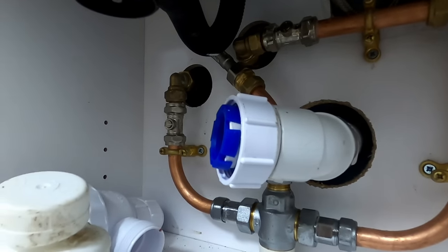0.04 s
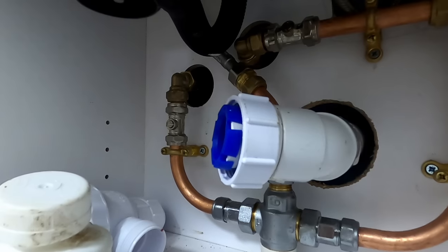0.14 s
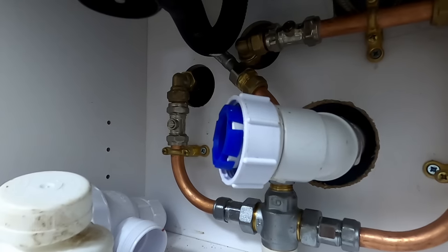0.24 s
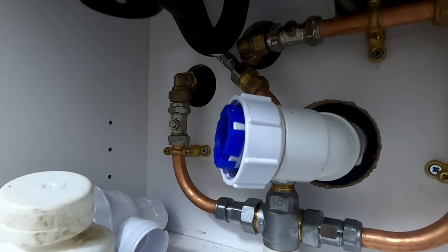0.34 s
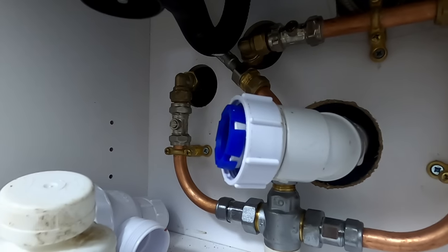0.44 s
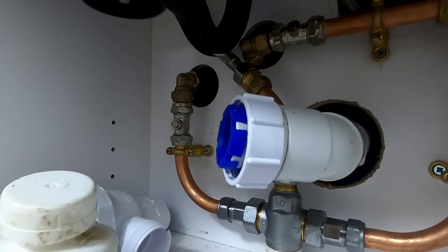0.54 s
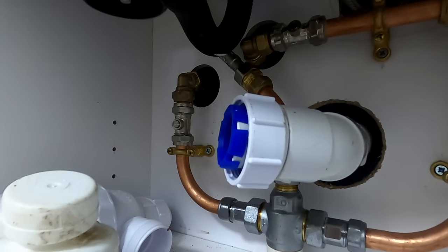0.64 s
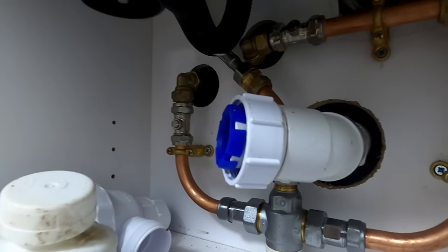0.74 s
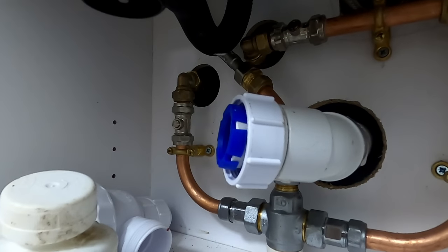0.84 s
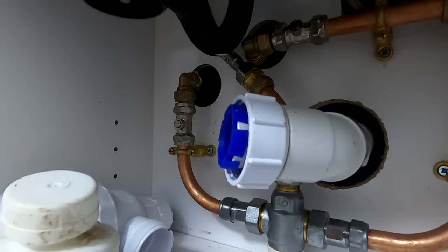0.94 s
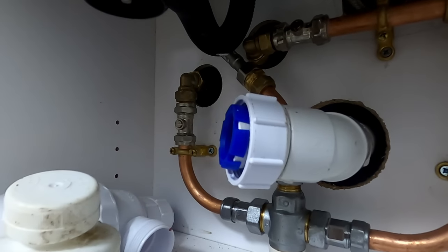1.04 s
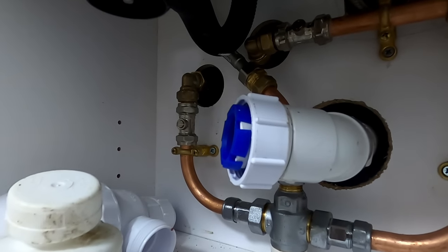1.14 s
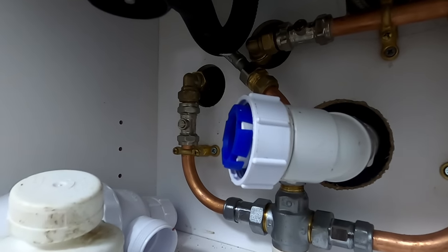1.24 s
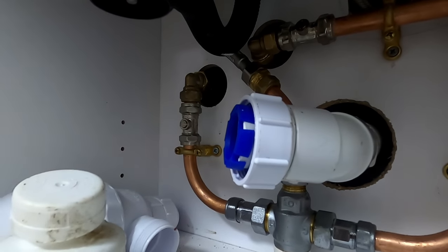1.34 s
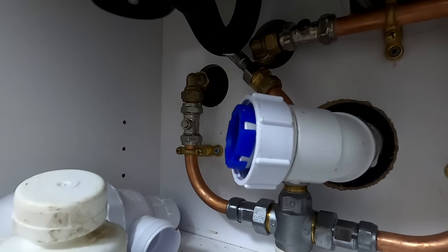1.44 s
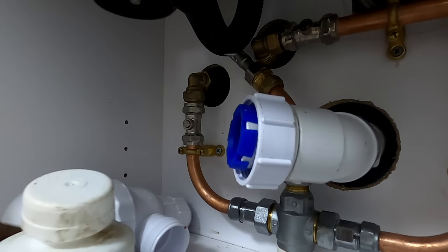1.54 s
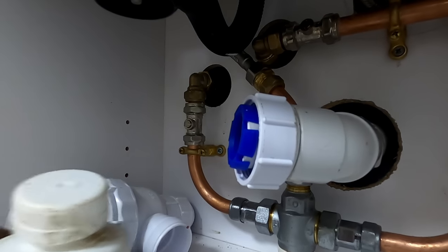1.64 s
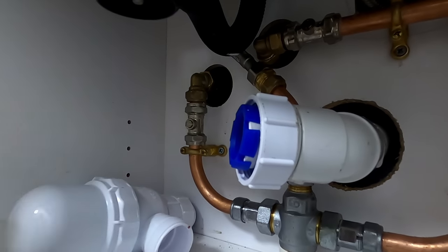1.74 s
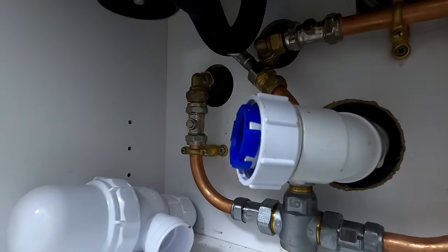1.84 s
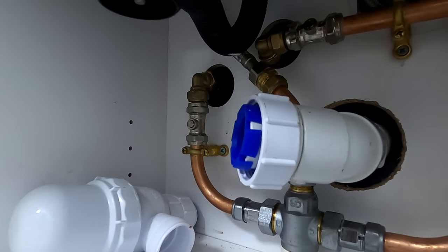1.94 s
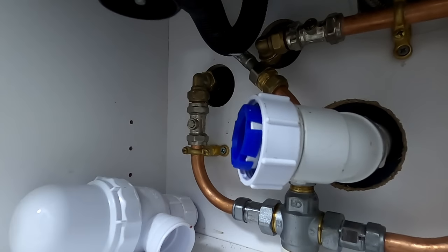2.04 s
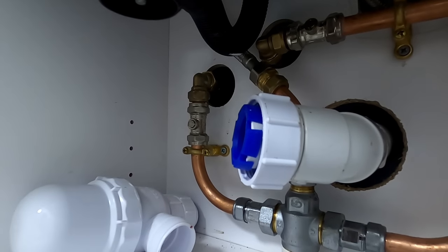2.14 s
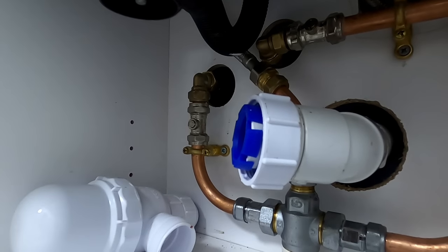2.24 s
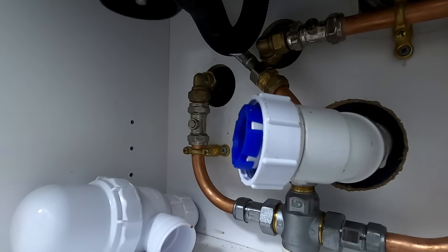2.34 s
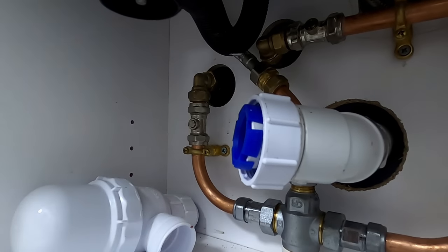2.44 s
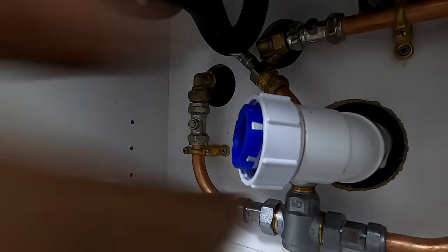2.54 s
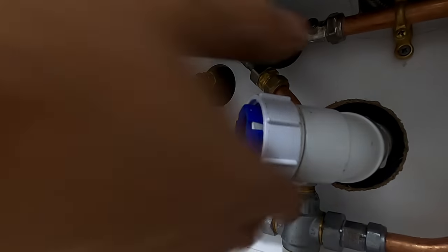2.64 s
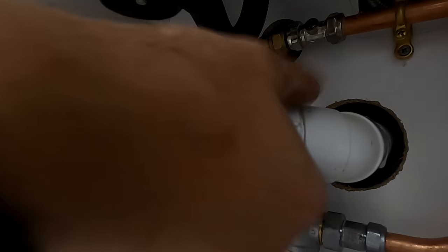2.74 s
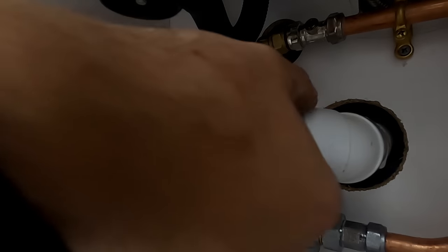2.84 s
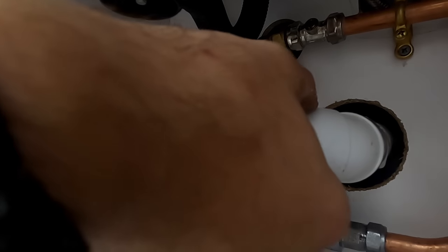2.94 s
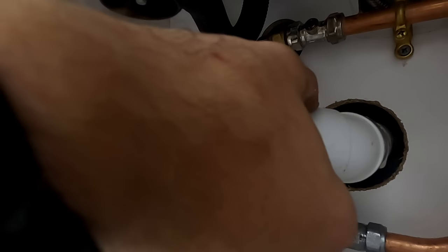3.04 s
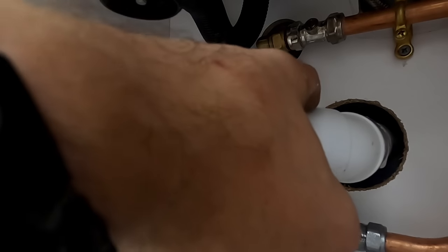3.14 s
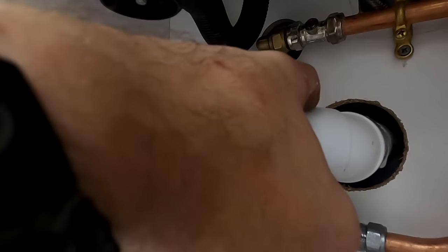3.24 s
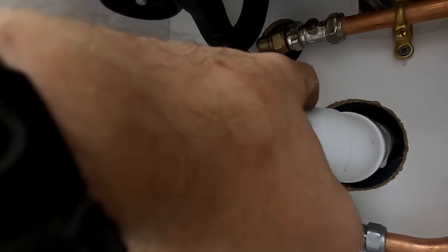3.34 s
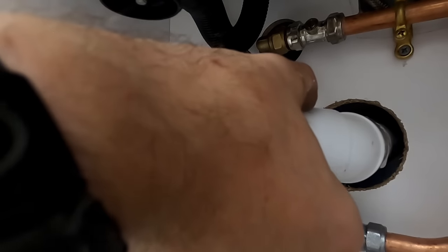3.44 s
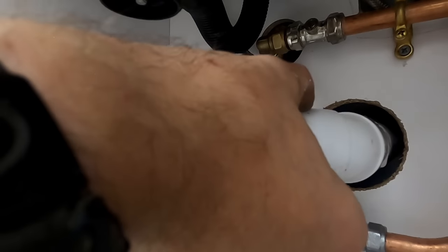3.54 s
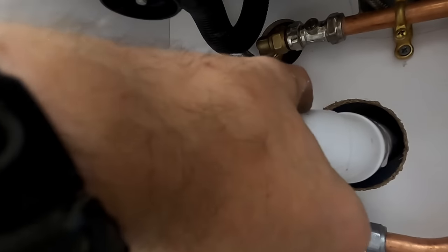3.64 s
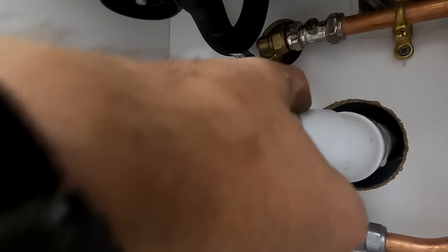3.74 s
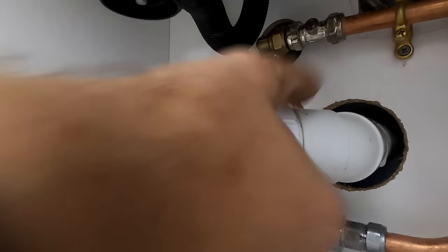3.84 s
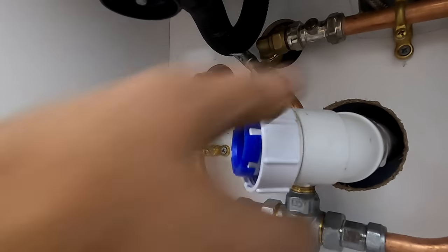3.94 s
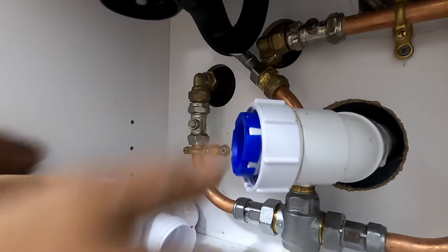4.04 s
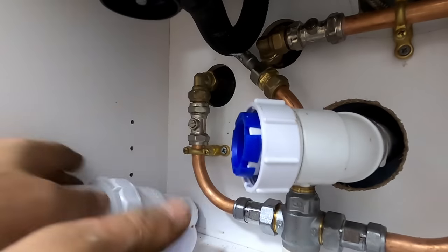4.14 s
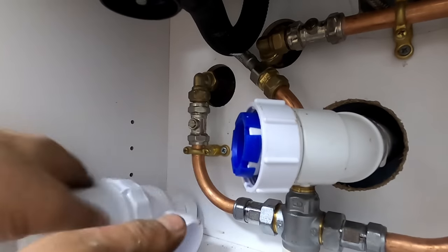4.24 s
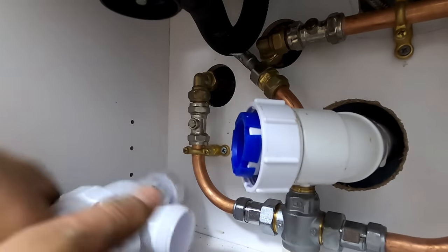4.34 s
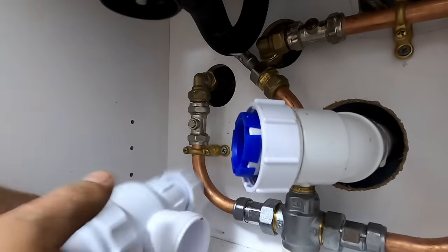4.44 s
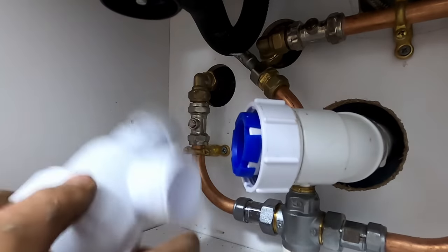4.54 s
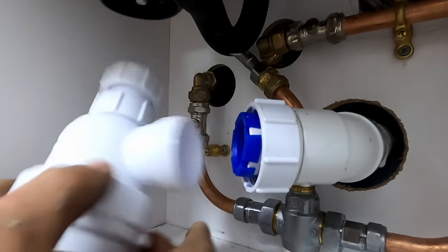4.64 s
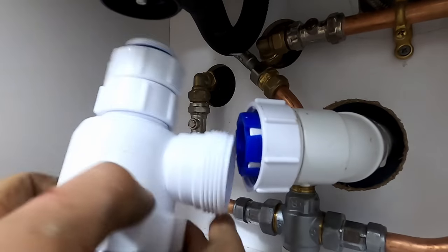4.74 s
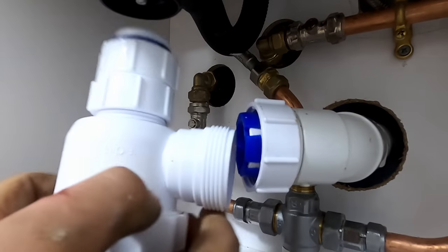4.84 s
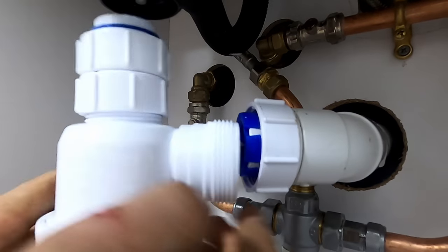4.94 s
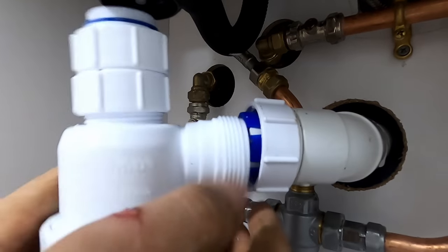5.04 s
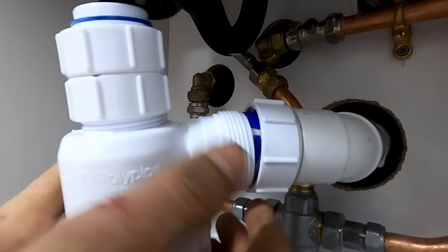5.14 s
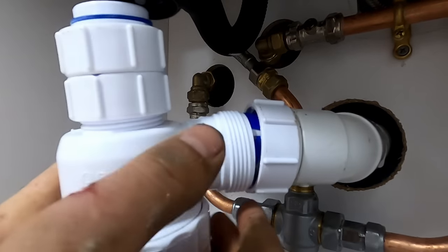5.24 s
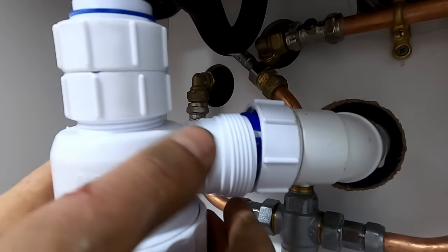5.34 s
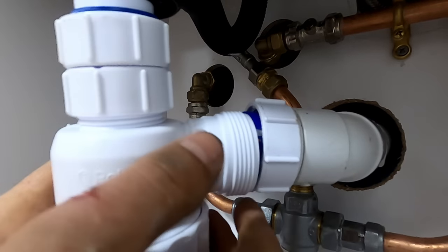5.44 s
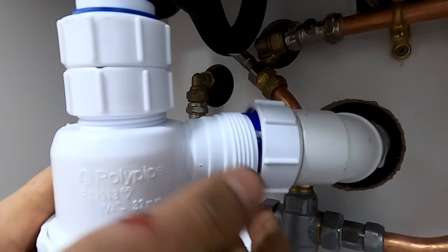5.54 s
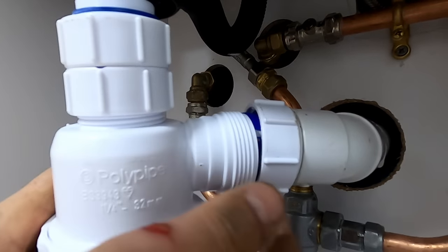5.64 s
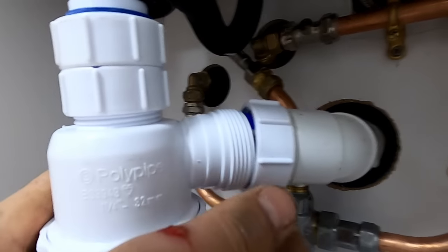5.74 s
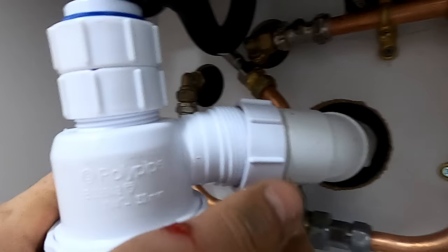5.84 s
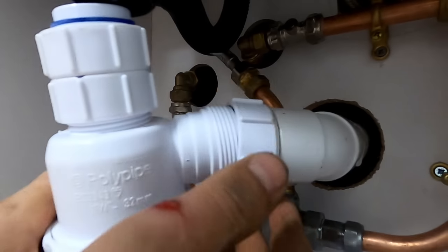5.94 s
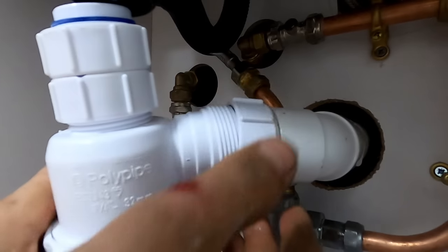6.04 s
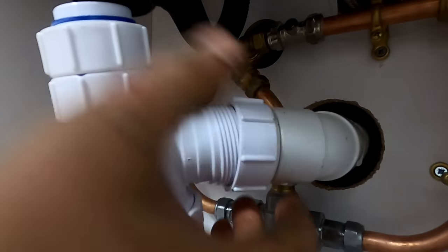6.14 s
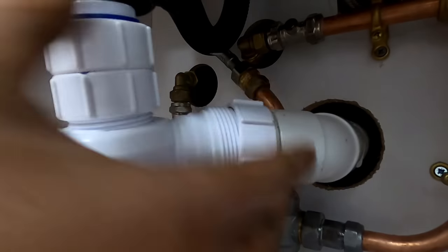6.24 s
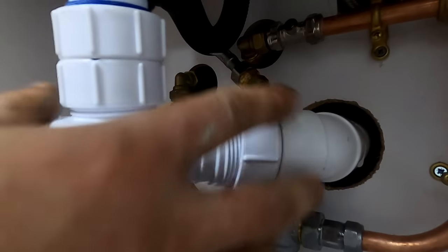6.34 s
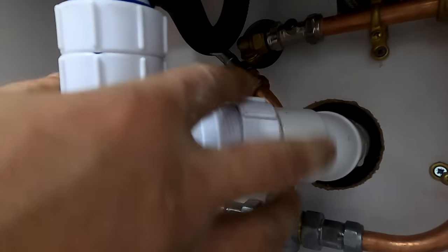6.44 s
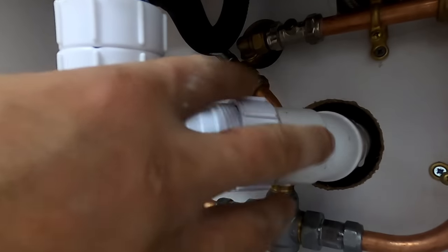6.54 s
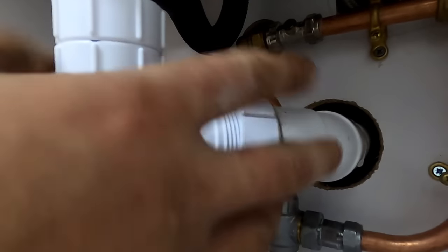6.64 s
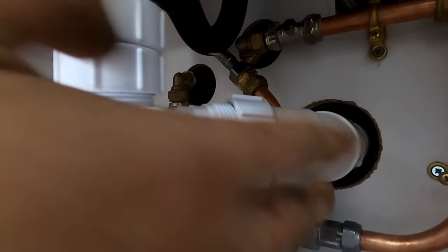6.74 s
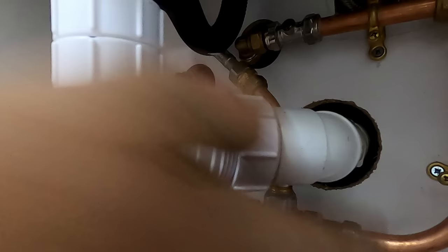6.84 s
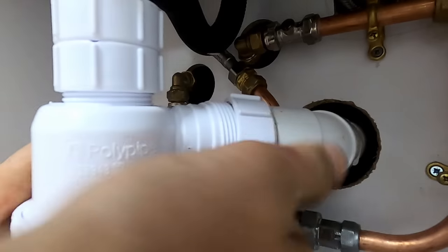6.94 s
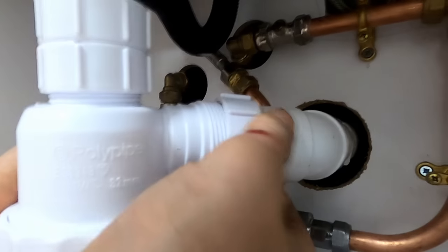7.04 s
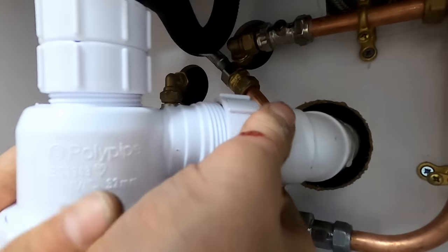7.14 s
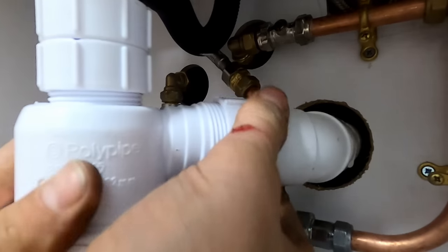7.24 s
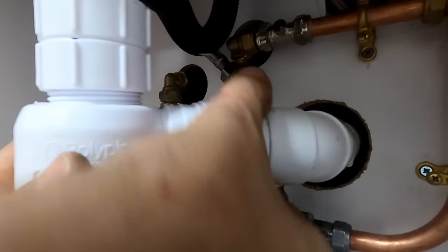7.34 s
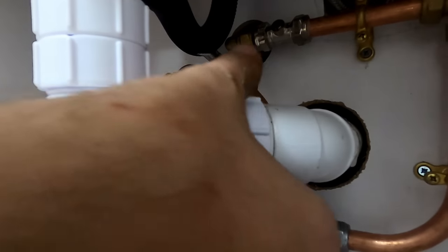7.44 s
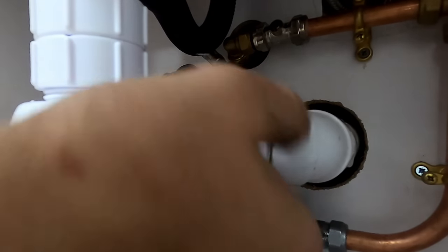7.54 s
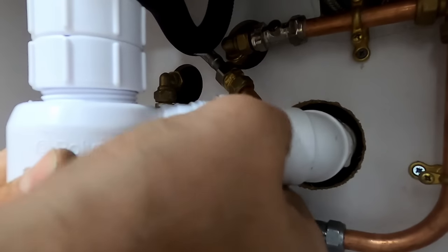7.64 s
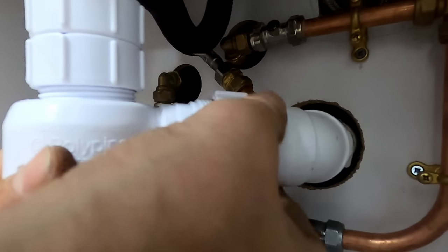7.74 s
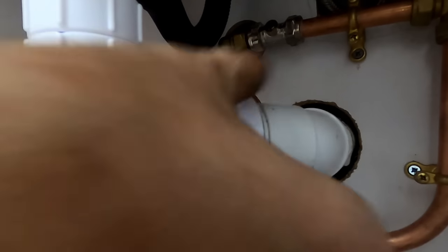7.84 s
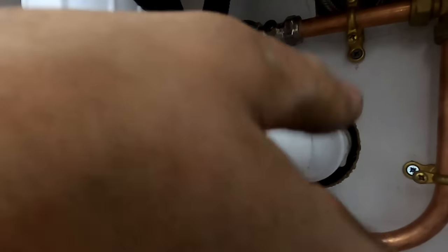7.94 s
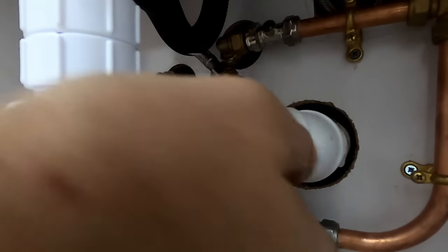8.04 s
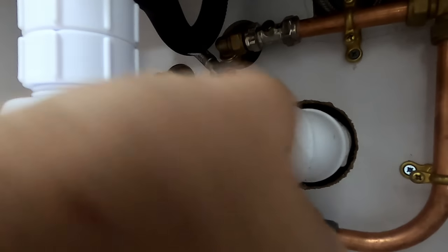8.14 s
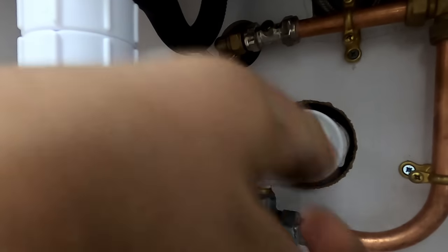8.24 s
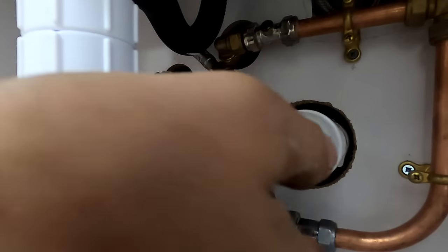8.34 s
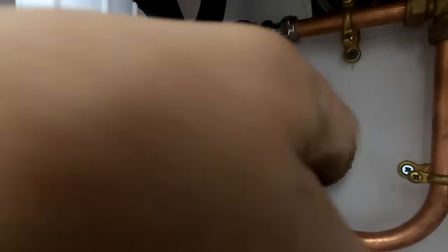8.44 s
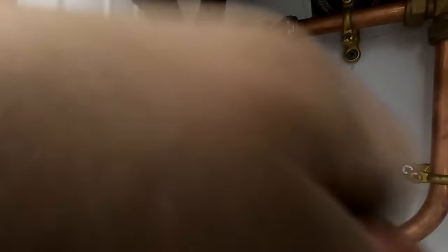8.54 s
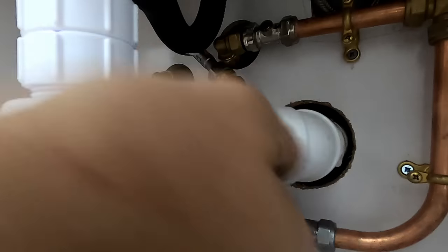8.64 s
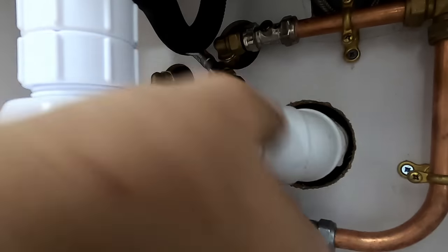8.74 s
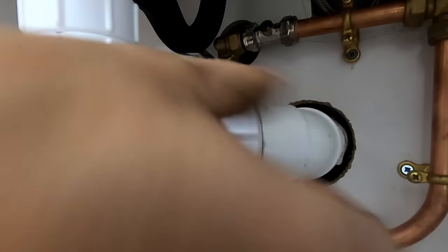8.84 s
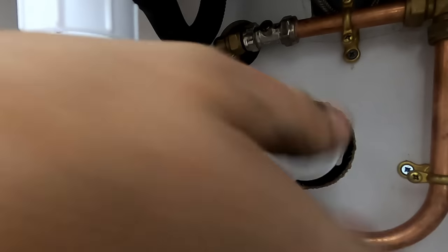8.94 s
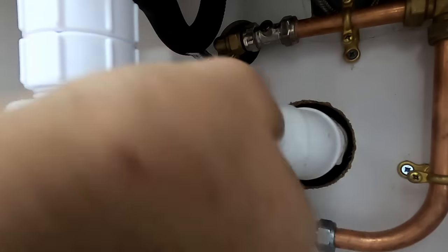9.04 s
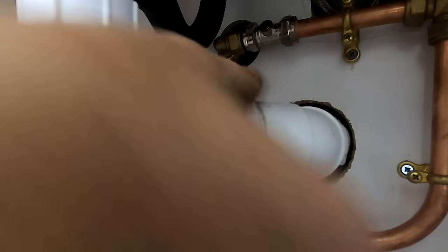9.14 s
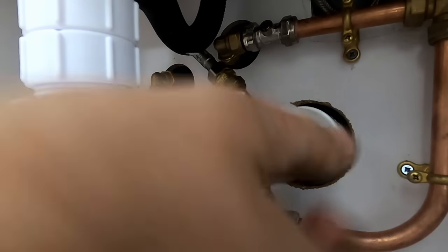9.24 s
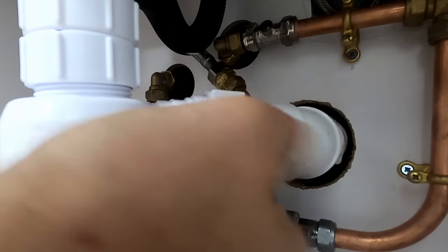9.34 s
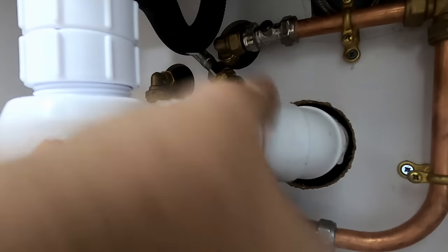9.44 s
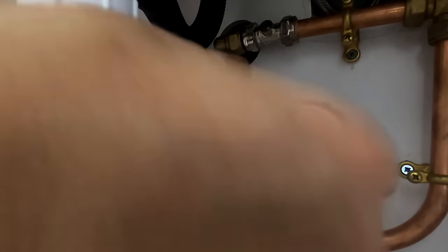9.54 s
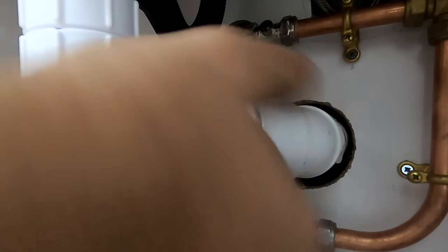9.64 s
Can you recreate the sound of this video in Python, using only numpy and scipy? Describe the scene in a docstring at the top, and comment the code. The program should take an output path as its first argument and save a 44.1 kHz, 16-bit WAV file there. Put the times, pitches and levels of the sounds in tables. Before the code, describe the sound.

Close microphone under a basin, quiet room with low rumble. Light sliding and a soft thud, one crisp plastic clack, then near silence. Quick hollow knocks and bright thread clatter as plastic parts are gathered and joined. Then a short low shudder, deep bumps, one strong thump, and repeated swishes of skin and sleeve with muffled plastic knocks as a nut is tightened, deep rumble growing.

```python
"""Hard plastic knocks as a bottle trap is picked up, pushed onto a waste pipe and its nut worked tight in a cabinet.
Each knock is a burst of contact force ringing the cabinet panels, the air in the trap, its thin walls and its rims.
Skids, shoves, soft bumps, scuffs, a loose fitting, a juddering seal and a squeaking thread drive rings in the same way.
Hands and a sleeve rub close to the microphone as shaped noise and tiny slips, and moving arms stir a deep rumble.
Behind it lie the short boom of the cabinet, a decaying noise echo, and a faint low room rumble."""
import sys
import numpy as np
from scipy import signal
from scipy.fft import rfft, irfft
from scipy.io import wavfile
from scipy.ndimage import uniform_filter1d

SR = 44100
rng = np.random.default_rng(int(sys.argv[2]) if len(sys.argv) > 2 else 0)


def master(y):
    """Save y as 16-bit WAV."""
    cut = np.clip(np.atleast_2d(y).T, -1, 1)
    pcm = np.round(cut * 32767)  # scale
    wavfile.write(sys.argv[1], SR, pcm.astype(np.int16))


N = 427769
RING_S = .4  # length of every impulse response
BLOW_S = .03  # lead-in before a blow lands, also the window that sets its level

# Hard plastic contacts.
# Columns: start_s, contact_s, level_db (before each part's share), hardness_db (plus for a rim, minus for a flat side)
KNOCKS = [(3.222, 0.0011, -39.5, 3), (3.557, 0.00052, -61, 11.5), (4.11, 0.0017, -44.5, -2.5),
          (4.198, 0.0011, -36.5, -3), (4.271, 0.0011, -39.5, 3.5), (4.294, 0.0035, -36, -7),
          (4.321, 0.00096, -36, -5), (4.376, 0.0018, -35.5, -4), (4.411, 0.001, -29.5, -2.5),
          (4.445, 0.0031, -34, -4), (4.531, 0.0016, -30.5, -2.5), (4.635, 0.0012, -32.5, 0.5),
          (4.811, 0.0011, -28.5, -1.5), (4.83, 0.0014, -40, 17), (4.863, 0.00031, -41, 8.5),
          (4.979, 0.00033, -27.5, 3), (5.039, 0.00036, -31, 5.5), (5.058, 0.0014, -45, 11.5),
          (5.187, 0.0021, -49, 1.5), (5.228, 0.00091, -49, 1.5), (5.547, 0.0019, -40, 3.5),
          (6.078, 0.00063, -45.5, -4), (6.435, 0.0013, -47.5, 4), (6.494, 0.00083, -48, -7.5),
          (6.768, 0.0037, -32, 4.5), (6.815, 0.0068, -30, 10), (6.869, 0.0028, -40.5, 4),
          (7.131, 0.0015, -33.5, 3), (7.163, 0.0013, -28.5, 0), (7.306, 0.00038, -45.5, -1.5),
          (7.759, 0.0054, -48.5, -1), (7.967, 0.0053, -37.5, 0.5), (7.99, 0.0029, -32, 2),
          (8.204, 0.00072, -37.5, 0.5), (8.359, 0.0019, -31.5, 2.5), (8.493, 0.0021, -38, 3),
          (8.591, 0.0049, -32, 2), (8.812, 0.0017, -51, 1), (8.957, 0.0026, -34.5, 5),
          (9.13, 0.0051, -45.5, 2.5), (9.177, 0.0016, -51.5, 2), (9.272, 0.00067, -50, 4.5),
          (9.312, 0.0039, -44, 2)]
# What each part takes of a knock; rows are panels, trap air, walls, rims.
# Columns: share_db, slope (dB per dB of hardness)
PART_SHARES = [(13.5, -0.48), (6.5, -0.98), (1, -0.08), (-7.5, 1.324)]


def knocks(panel_lag_s=0.0018):
    """Plastic on plastic: a hard contact favours the rims, a soft one the heavy panels, which ring a moment later."""
    out = np.zeros(N)
    parts = (panels, trap_air, walls, rims)
    lags_s = (panel_lag_s, 0, 0, 0)
    for start_s, contact_s, level_db, hardness_db in KNOCKS:
        force = contact(contact_s)
        for part, (share_db, slope), lag_s in zip(parts, PART_SHARES, lags_s):
            part_db = level_db + share_db + slope * hardness_db
            add(out, start_s - BLOW_S + lag_s, strike(force, part(), part_db))
    return out


def contact(contact_s, chatter_rate=6000, first=0.84, graze_db=-15, graze_s=0.011,
            slide_db=-25, slide_s=0.029, glancing_s=0.0018):
    """Force of a blow that lands BLOW_S in: the faces graze, touch, chatter as they skid together and slide to rest."""
    lead = int(BLOW_S * SR)
    t = np.arange(-lead, 4 * lead) / SR
    age = np.maximum(t, 0) / max(contact_s, 1 / 2000)
    skid = np.e * age * np.exp(-age)
    glancing = min(contact_s / glancing_s, 1)  # a square, short hit hardly grazes
    graze = undb(graze_db) * glancing * np.exp(-np.abs(t) / graze_s)
    slide = undb(slide_db) * (t > 0) * np.exp(-np.abs(t) / slide_s)
    force = slips(len(t), chatter_rate, spread_db=3.5) * (skid + graze + slide)
    force /= np.linalg.norm(force)
    # the longer the skid, the less of the force is in the first touch
    force[lead] += first * np.exp(-contact_s / 0.0026)
    return force


def strike(force, response, level_db):
    """A part driven by a force; its energy up to BLOW_S after landing sets the level."""
    sound = signal.fftconvolve(force, response)
    # the window also spans the lead-in, so it is twice as long as the blow
    return undb(level_db) * unit(sound, 2 * BLOW_S) * np.sqrt(1 / 2)


def ring(modes, crowd, crowd_db, crowd_t60, scatter_db=4.5):
    """Impulse response of a part; contact point and grip change every mode's strength and pitch a little."""
    t = np.arange(int(RING_S * SR)) / SR
    pitch_hz, level_db, t60_s = np.transpose(modes)[:, :, None]
    strength, detune, sign = rng.standard_normal((3, len(modes), 1))
    phase = 2 * np.pi * pitch_hz * (1 + .004 * detune) * t
    swell = 1 - np.exp(-phase / np.pi)  # a mode needs about half a cycle to get going
    decay = np.exp(-np.log(1000) * t / t60_s)
    lines = np.sign(sign) * undb(level_db + scatter_db * strength) * decay * swell * np.sin(phase)
    weak_modes = unit(shape(tail(crowd_t60), crowd), BLOW_S)
    return unit(lines.sum(0), BLOW_S) + undb(crowd_db) * weak_modes


# Strong modes of the cabinet panels. Columns: pitch_hz, level_db (relative), t60_s
PANEL_MODES = [(103, -4.5, 0.086), (123.5, -5, 0.24), (147.15, 0.5, 0.21), (191, 2, 0.15),
               (213.7, 0, 0.078), (259, -6, 0.061)]
# Crowd of weak panel modes between the strong ones. Columns: pitch_hz, level_db (per Hz, relative)
PANEL_CROWD = [(25, -23.5), (60, -4), (150, 13.5), (290, 1.5), (1000, -73)]


def panels():
    """Response of the cabinet panels at one contact point."""
    return ring(PANEL_MODES, PANEL_CROWD, crowd_db=-1.5, crowd_t60=0.034)


# Strong modes of the air in the trap. Columns: pitch_hz, level_db (relative), t60_s
AIR_MODES = [(310, -7, .07), (425, 3, .12), (500, 0, .09), (655, -5, .13), (777, -13, .1), (964, -8, .09)]
# Crowd of weak air modes, also used for the bowl. Columns: pitch_hz, level_db (per Hz, relative)
AIR_CROWD = [(150, -39), (390, 8), (950, -12), (3300, -76)]


def trap_air():
    """Response of the air inside the trap."""
    return ring(AIR_MODES, AIR_CROWD, crowd_db=7.0, crowd_t60=0.073)


# Strong modes of the thin walls. Columns: pitch_hz, level_db (relative), t60_s
WALL_MODES = [(1135, -2, .07), (1305, 0, .07), (1460, -1, .06), (1800, -1, .07), (1980, -1, .06),
              (2538, -1, .06)]
# Crowd of weak wall modes. Columns: pitch_hz, level_db (per Hz, relative)
WALL_CROWD = [(650, -15), (1150, -12), (2700, -16.5), (8000, -65.5)]


def walls():
    """Response of the trap's thin walls."""
    return ring(WALL_MODES, WALL_CROWD, crowd_db=8, crowd_t60=0.066, scatter_db=3)


# Strong modes of the rims and threads. Columns: pitch_hz, level_db (relative), t60_s
RIM_MODES = [(3352, -7, .06), (3830, -2, .08), (3940, -2, .07), (4161, 0, .08), (4700, 0, .08),
             (6120, -10, .05)]
# Crowd of weak rim modes. Columns: pitch_hz, level_db (per Hz, relative)
RIM_CROWD = [(1900, -34), (3400, 1.5), (4850, -4.5), (5400, -14.5), (7000, -13.5), (8300, -24),
             (12500, -30.5), (16000, -41)]


def rims():
    """Response of the stiff rims and threads."""
    return ring(RIM_MODES, RIM_CROWD, crowd_db=9, crowd_t60=0.042, scatter_db=2)


# The threaded spigot skids over the rim of the nut. Columns: start_s, length_s, level_db
SKIDS = [(4.835, 0.068, -40), (5.014, 0.072, -43.5), (6.822, 0.061, -46)]


def skids(slip_rate=900):
    """Thread ridges trip over the rim and keep it ringing: a dense, bright clatter."""
    out = np.zeros(N)
    for start_s, length_s, level_db in SKIDS:
        force = slips(int(length_s * SR), slip_rate, spread_db=5.5)
        force *= signal.windows.tukey(len(force), .5)
        ringing = signal.fftconvolve(force, rims())
        add(out, start_s, undb(level_db) * unit(ringing, length_s))
    return out


# The trap is shoved home and its empty bowl thumps. Columns: start_s, level_db
SHOVES = [(7.136, -16), (7.166, -21)]
# Modes of the bowl. Columns: pitch_hz, level_db (relative), t60_s
BOWL_MODES = [(243, -6, 0.034), (322, 3, 0.029)]


def shoves():
    """Pushing the trap hard against the pipe sets its whole bowl going."""
    out = np.zeros(N)
    for start_s, level_db in SHOVES:
        force = contact(1 / 1000)
        bowl = ring(BOWL_MODES, AIR_CROWD, crowd_db=-15.0, crowd_t60=0.026)
        add(out, start_s - BLOW_S, strike(force, bowl, level_db))
    return out


# Soft hand bumps on the pipework. Columns: start_s, level_db (of the panels)
BUMPS = [(1.583, -15.5), (1.714, -27), (4.151, -16), (4.378, -15.5), (5.188, -15.5), (5.279, -26),
         (5.385, -15.5), (6.076, -16), (6.381, -11), (6.493, -18.5), (7.018, -28.5), (7.295, -23.5),
         (8.232, -17), (8.493, -17.5), (8.779, -19.5), (9.132, -22), (9.472, -24), (9.527, -35)]


def bumps(push_s=0.0026, flesh_hz=260, air_db=-19):
    """Flesh is soft: its long push reaches only the panels and the air in the trap."""
    out = np.zeros(N)
    for start_s, level_db in BUMPS:
        force = soften(soften(contact(push_s), flesh_hz), flesh_hz)
        thump = strike(force, panels(), level_db)
        air = strike(force, trap_air(), level_db + air_db)
        add(out, start_s - BLOW_S, thump + air)
    return out


# Spectrum of rubbing, also of the dry grit in a scuff. Columns: pitch_hz, level_db (per Hz, relative)
RUB_COLOUR = [(200, 2.5), (480, 9.5), (1050, -6.5), (1800, 0.5), (4900, -3.5), (7200, -9), (8300, -17.5),
              (12700, -33), (16000, -43)]
# Parts dragged over a surface. Columns: start_s, length_s, level_db (of the trap air)
SCUFFS = [(0.08, 0.02, -52), (0.112, 0.068, -52), (0.265, 0.074, -40.5), (0.753, 0.011, -44.5),
          (0.809, 0.079, -42.5), (1.035, 0.029, -42.5), (1.566, 0.13, -32), (4.282, 0.34, -38),
          (5.365, 0.052, -44.5), (5.86, 0.2, -36.5), (9.62, 0.057, -45)]


def scuffs(slip_rate=1500, grit_db=-13, wall_db=-14, damp_s=0.012, panel_db=7.5, light_db=-40, weight=0.76):
    """Slips through the same parts; the surface damps them and adds dry grit; heavy drags load the panels most."""
    out = np.zeros(N)
    damping = np.exp(-np.arange(int(RING_S * SR)) / SR / damp_s)
    for start_s, length_s, level_db in SCUFFS:
        force = slips(int(length_s * SR), slip_rate, spread_db=0.0)
        force *= signal.windows.tukey(len(force), .45)
        load_db = panel_db + weight * max(level_db - light_db, 0)
        for part, share_db in zip((panels, trap_air, walls), (load_db, 0, wall_db)):
            ringing = signal.fftconvolve(force, part() * damping)
            add(out, start_s, undb(level_db + share_db) * unit(ringing, length_s))
        add(out, start_s, undb(level_db + grit_db) * colour(force, RUB_COLOUR))
    return out


# A loose fitting clacks, then rocks to rest on its flat side.
# Columns: start_s, contact_s, level_db, bandwidth_hz (of the contact)
CLACKS = [(2.45, 0.00089, -26.5, 9000), (2.456, 0.0016, -28, 9090), (2.521, 0.0012, -47.5, 800),
          (2.563, 0.00092, -47, 800)]


def clacks():
    """A free fitting rings by itself, with no thump from the cabinet."""
    out = np.zeros(N)
    for start_s, contact_s, level_db, bandwidth_hz in CLACKS:
        force = soften(soften(contact(contact_s), bandwidth_hz), bandwidth_hz)
        add(out, start_s - BLOW_S, strike(force, fitting(), level_db))
    return out


# Strong modes of the loose fitting. Columns: pitch_hz, level_db (relative), t60_s
FITTING_MODES = [(468, 0, 0.085), (525, 2, 0.06), (740, -1, 0.03), (1850, -5, 0.06), (2030, -5, 0.04),
                 (2560, -1, 0.045), (3090, -2, 0.03), (3790, -7, .035)]
# Crowd of weak fitting modes. Columns: pitch_hz, level_db (per Hz, relative)
FITTING_CROWD = [(350, -33.5), (650, 4.5), (1100, -10), (1900, 4), (4400, -2), (7000, -20.5),
                 (15000, -30.5)]


def fitting(scatter_db=1.0, stretch=1):
    """Response of a loose fitting that no hand damps; stretch scales the pitch of its strong modes."""
    modes = [(pitch_hz * stretch, level_db, t60_s) for pitch_hz, level_db, t60_s in FITTING_MODES]
    return ring(modes, FITTING_CROWD, crowd_db=-1, crowd_t60=0.04, scatter_db=scatter_db)


# A fitting slides lightly. Columns: start_s, length_s, level_db (of the ringing)
SLIDES = [(0.272, 0.078, -52), (1.459, 0.28, -50), (1.686, 0.19, -53.5), (2.42, 0.043, -38),
          (2.469, 0.14, -57.5), (4.389, 0.13, -45.5), (8.217, 0.06, -50), (8.838, 0.049, -52.5),
          (9.53, 0.14, -59.5)]
# Filter on the ringing and hiss of a slide. Columns: pitch_hz, gain_db (relative)
SLIDE_COLOUR = [(500, -15.5), (1850, 3.5), (3000, -2), (7000, -3.5), (9000, -16.5), (15000, -20.5)]


def slides(slip_rate=4000, hiss_db=-3, shift=.02, count=4):
    """Fine slips hiss and keep the fitting ringing; its colour shifts as the contact point travels."""
    out = np.zeros(N)
    for start_s, length_s, level_db in SLIDES:
        force = slips(int(length_s * SR), slip_rate, spread_db=-0.5)
        force *= signal.windows.tukey(len(force), .65)
        force = np.pad(force, (0, int(BLOW_S * SR)))
        place = np.linspace(0, count - 1, len(force))
        ringing = 0
        for k in range(count):  # crossfade from one contact point to the next
            nearness = np.maximum(1 - np.abs(place - k), 0)
            response = fitting(stretch=1 + shift * rng.uniform(-0.56, 1))
            ringing = ringing + signal.fftconvolve(force * nearness, response)
        add(out, start_s, undb(level_db) * unit(shape(ringing, SLIDE_COLOUR), length_s))
        add(out, start_s, undb(level_db + hiss_db) * unit(shape(force, SLIDE_COLOUR), length_s))
    return out


# The rubber seal judders as the pipe slides in. One row: start_s, length_s, slip_rate (slips per s), level_db
SEAL_JUDDER = (6, 0.21, 85, -21)


def judder(uneven=0.214, grip_hz=400):
    """The seal sticks and slips in quick jerks, and the panels shudder with it."""
    start_s, length_s, slip_rate, level_db = SEAL_JUDDER
    count = int(length_s * slip_rate)
    gaps = np.abs(1 + uneven * rng.standard_normal(count))
    times_s = np.cumsum(gaps) / slip_rate
    force = np.zeros(int(times_s[-1] * SR) + 1)
    force[(times_s * SR).astype(int)] = signal.windows.tukey(count, .5)
    shudder = signal.fftconvolve(soften(force, grip_hz), panels())
    out = np.zeros(N)
    add(out, start_s, undb(level_db) * unit(shudder, length_s))
    return out


# The nut's thread squeaks as it turns. Columns: start_s, length_s, pitch_hz (resonance), level_db
SQUEAKS = [(6.381, .055, 1440, -44.5), (7.297, 0.025, 1520, -40.5), (7.752, 0.029, 1530, -41.5)]


def squeaks(slip_rate=1200, width_hz=300):
    """Quick slips in the thread ring one resonance of the nut, which moves with the grip."""
    out = np.zeros(N)
    for start_s, length_s, pitch_hz, level_db in SQUEAKS:
        force = slips(int(length_s * SR), slip_rate, spread_db=4)
        force = np.pad(force * np.hanning(len(force)), (0, int(BLOW_S * SR)))
        edges_hz = [pitch_hz - width_hz / 2, pitch_hz + width_hz / 2]
        band = signal.butter(2, edges_hz, "band", fs=SR, output="sos")
        add(out, start_s, undb(level_db) * unit(signal.sosfilt(band, force), length_s))
    return out


def rubbing(hiss_db=0.0, uneven_db=2, rasp_db=-14.0, rasp_rate=220):
    """Skin and cloth swish unevenly over plastic; under a firm grip tiny slips rasp on the walls."""
    hiss = undb(hiss_db) * colour(rng.standard_normal(N), RUB_COLOUR)
    rasp = signal.fftconvolve(slips(N, rasp_rate, spread_db=5.0), walls())[:N]
    rasp = undb(rasp_db) * unit(rasp)
    sliding = effort([rub_db for *_, rub_db, load_db in STROKES])
    gripping = effort([(rub_db + load_db) / 2 for *_, rub_db, load_db in STROKES])
    return (hiss * sliding + rasp * gripping) * undb(uneven_db * walk(35))


# Strokes of hand and sleeve: reaching in, lifting the trap, sliding it home, then turn after turn of the nut.
# Columns: start_s, length_s, rub_db, load_db (on the panels)
STROKES = [(1.92, 0.52, -56, -65), (2.688, 0.23, -66.5, -54.5), (3.212, 0.19, -72.5, -47),
           (3.888, 0.071, -59, -56.5), (4.124, 0.35, -51.5, -31), (4.73, 0.36, -50.5, -37),
           (5.378, 0.54, -67.5, -44), (5.836, 0.33, -49, -31), (6.369, 0.16, -55.5, -29.5),
           (6.682, 0.86, -59, -39), (7.102, 0.2, -52, -31.5), (7.42, 0.14, -61.5, -39),
           (7.669, 0.28, -55.5, -31.5), (8.218, 0.14, -49, -32), (8.488, 0.092, -52.5, -26.5),
           (8.775, 0.24, -54, -29), (9.129, 0.15, -52.5, -29.5), (9.444, 0.2, -55.5, -36.5)]
ARCH_DB = 1.5  # a stroke is this much weaker at its ends than in its middle
SWELL, FADE = 0.092, 0.23  # time constants before and after a stroke, as shares of its length


def effort(levels_db):
    """Gain at every sample: each stroke swells, arches and fades, the long ones more gently."""
    t = np.arange(N) / SR
    gain = np.zeros(N)
    for (start_s, length_s, *_), level_db in zip(STROKES, levels_db):
        along = (t - start_s) / length_s
        arch_db = level_db - ARCH_DB * (2 * np.clip(along, 0, 1) - 1) ** 2
        fade = np.maximum(-along, 0) / SWELL + np.maximum(along - 1, 0) / FADE
        near = fade < 10
        gain[near] += undb(arch_db[near]) * np.exp(-fade[near])
    return gain


# Spectrum of the high hiss. Columns: pitch_hz, level_db (per Hz, relative)
HISS_COLOUR = [(1000, -21), (7000, -5), (9000, 1), (13000, 9), (16000, -6)]


def stroke_hiss(hiss_db=-19):
    """Independent high hiss in each channel, following the rub of the strokes; hiss_db is relative to that rub."""
    hiss = np.array([colour(rng.standard_normal(N), HISS_COLOUR) for _ in range(2)])
    return undb(hiss_db) * hiss * effort([rub_db for *_, rub_db, load_db in STROKES])


# Arms and body moving ever closer, felt more than heard. Columns: start_s, level_db (before its wavering)
BODY_RUMBLE = [(0, -68), (4.3, -65), (9.6, -37)]
# Spectrum of the deep rumble. Columns: pitch_hz, level_db (per Hz, relative)
RUMBLE_COLOUR = [(12, -10), (35, -3), (65, 13.5), (300, -46.5), (2000, -130)]
# Jolts of the arm, heard as deep thuds. Columns: start_s, level_db (before softening)
LURCHES = [(3.24, -28.5), (3.929, -27.5), (7.135, -12.5)]
LURCH_S = 0.038  # time constant of a jolt's fade
RESTING_DB = -64.5  # drive of the panels under an idle hand


def swaying(uneven_db=3, arm_db=-11):
    """Each stroke shifts the grip and sets the panels muttering; moving arms stir a deep rumble."""
    load = effort([load_db for *_, load_db in STROKES])
    response = panels()
    drive = unit(slips(N, 200, spread_db=4)) * (load + undb(RESTING_DB))
    mutter = signal.fftconvolve(drive, response / np.linalg.norm(response))[:N]
    t = np.arange(N) / SR
    lurch = np.zeros(N)
    for start_s, level_db in LURCHES:
        lurch += undb(level_db) * (t > start_s) * np.exp(-np.abs(t - start_s) / LURCH_S)
    lurch = soften(lurch, 1 / LURCH_S)
    rumble = colour(rng.standard_normal(N), RUMBLE_COLOUR)
    rumble *= curve(BODY_RUMBLE) + undb(arm_db) * load + lurch
    return (mutter + rumble) * undb(uneven_db * walk(12))


def reflections(dry, low_db=-14, low_t60=0.36, high_db=-17, high_t60=0.44, split_hz=450):
    """Diffuse echo of the cabinet and the small room: noise decaying in two bands, the lower one weighted more."""
    echo = 0
    for kind, level_db, t60 in (("low", low_db, low_t60), ("high", high_db, high_t60)):
        noise = tail(t60)
        band = signal.butter(2, split_hz, kind, fs=SR, output="sos")
        echo = echo + undb(level_db) * signal.sosfilt(band, noise / np.linalg.norm(noise))
    return signal.fftconvolve(dry, echo)[:N]


# Spectrum of the room rumble. Columns: pitch_hz, level_db (per Hz, relative)
ROOM_COLOUR = [(20, -14.5), (55, 0.5), (115, 0.5), (260, -32), (500, -40.5), (7000, -53), (9000, -63.5),
               (16000, -68.5)]
ROOM_DB = -48.5  # centre of its wavering level


def room_rumble():
    """Faint, low, coloured noise of the room, its level wavering slowly."""
    return colour(rng.standard_normal(N), ROOM_COLOUR) * undb(ROOM_DB + 2 * walk(4.5))


# Stereo width over time, widest from 3.2 to 5 s. Columns: start_s, width_db (added to side_db)
STEREO_WIDTH = [(3.0, -26.5), (3.2, 4.5), (4.55, 7.5), (4.95, -2), (5.2, -36)]
# Side level by frequency, relative to mid, before the width curve. Columns: pitch_hz, side_db
SIDE_LEVEL = [(80, -36.5), (250, -20.5), (1500, -20), (5000, -10)]


def spread(x, diffuse_t60=.04):
    """Adds a short diffuse side signal, opposite in the two channels, with width following the curve."""
    phases = np.angle(rfft(tail(diffuse_t60)))
    diffuse = irfft(np.exp(1j * phases))[:int(BLOW_S * SR)]  # random phases on a flat spectrum, cut short
    smeared = signal.fftconvolve(x * curve(STEREO_WIDTH), diffuse / np.linalg.norm(diffuse))[:N]
    side = shape(smeared, SIDE_LEVEL)
    return np.array([x + side, x - side])


def undb(db):
    """Decibels to gain."""
    return 10 ** (np.asarray(db) / 20)


def unit(x, seconds=None):
    """Scale to rms 1, judged over the first seconds or over all."""
    head = x if seconds is None else x[:max(int(seconds * SR), 2)]
    return x / np.sqrt(np.mean(head ** 2) + 1e-18)


def curve(rows):
    """Gain at every sample from (start_s, level_db) rows."""
    return undb(np.interp(np.arange(N) / SR, *np.transpose(rows)))


def shape(x, points):
    """Causal (minimum-phase) filter with the gains of a (pitch_hz, gain_db) spectrum."""
    pitch_hz, gain_db = np.transpose(points)
    size = 4096
    f = np.maximum(np.arange(size // 2 + 1) * SR / size, 1)
    cepstrum = irfft(np.log(undb(np.interp(np.log(f), np.log(pitch_hz), gain_db))))
    # folding the cepstrum onto positive time makes the phase minimal
    cepstrum[1:size // 2] *= 2
    cepstrum[size // 2 + 1:] = 0
    return signal.fftconvolve(x, irfft(np.exp(rfft(cepstrum))))[:len(x)]


def colour(x, points):
    """Give a sound a spectrum, at rms 1."""
    return unit(shape(x, points))


def soften(force, hz):
    """A yielding contact passes little above the given frequency."""
    return signal.sosfilt(signal.butter(2, hz, fs=SR, output="sos"), force)


def walk(rate):
    """Smooth random wander at rms 1, with rate new targets per second."""
    k = int(SR / rate)
    return unit(uniform_filter1d(np.repeat(rng.standard_normal(N // k + 1), k), k)[:N])


def slips(n, rate, spread_db):
    """Tiny stick-slip impulses at random moments, rate per second; a wide spread makes a few much larger."""
    hits = rng.random(n) < rate / SR
    return hits * rng.standard_normal(n) * undb(spread_db * rng.standard_normal(n))


def tail(t60):
    """Noise that decays at the rate of 60 dB in t60 seconds."""
    t = np.arange(int(RING_S * SR)) / SR
    return rng.standard_normal(len(t)) * np.exp(-np.log(1000) * t / t60)


def add(track, start_s, sound):
    """Mix a sound in at a time."""
    i = max(int(start_s * SR), 0)
    track[i:i + len(sound)] += sound[:N - i]


def scene():
    """All handling sounds in the cabinet, over the room's wavering rumble, with the high hiss of the strokes on top."""
    hits = knocks() + skids() + shoves() + bumps()
    drags = scuffs() + clacks() + slides() + judder() + squeaks()
    dry = hits + drags + rubbing() + swaying()
    return spread(dry + reflections(dry) + room_rumble()) + stroke_hiss()


TOP_HZ = 15850  # edge of the steep low-pass


def record(dry, left_air_db=-4, right_air_db=3, air_hz=10500):
    """The right channel is given more treble above air_hz than the left; the very top is cut."""
    high = signal.butter(4, air_hz, "high", fs=SR, output="sos")
    air = signal.sosfiltfilt(high, dry)
    channels = dry + (undb([[left_air_db], [right_air_db]]) - 1) * air
    return signal.sosfilt(signal.ellip(10, .2, 80, TOP_HZ, fs=SR, output="sos"), channels)


dry = scene()
out = record(dry)
master(out)
```